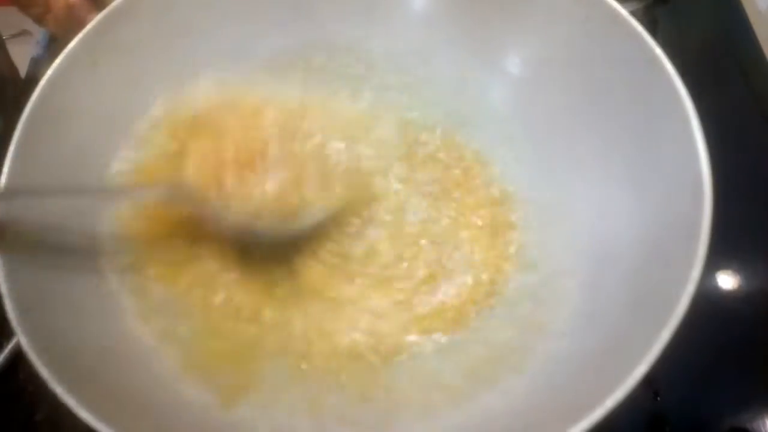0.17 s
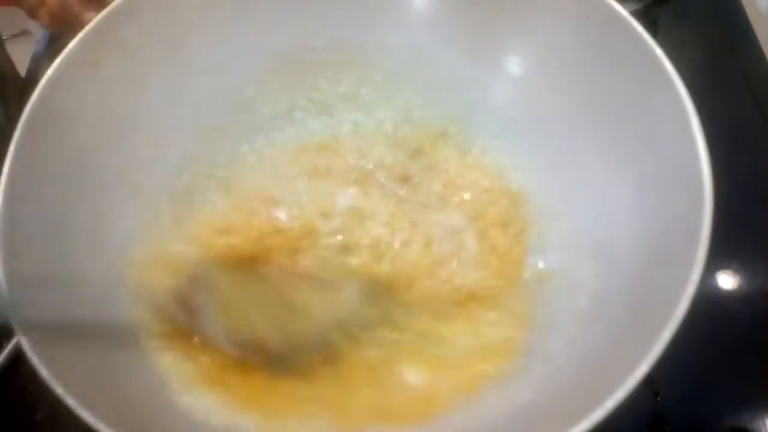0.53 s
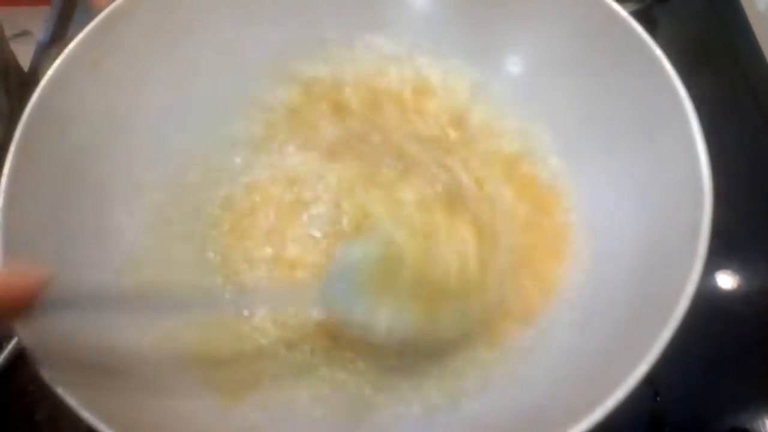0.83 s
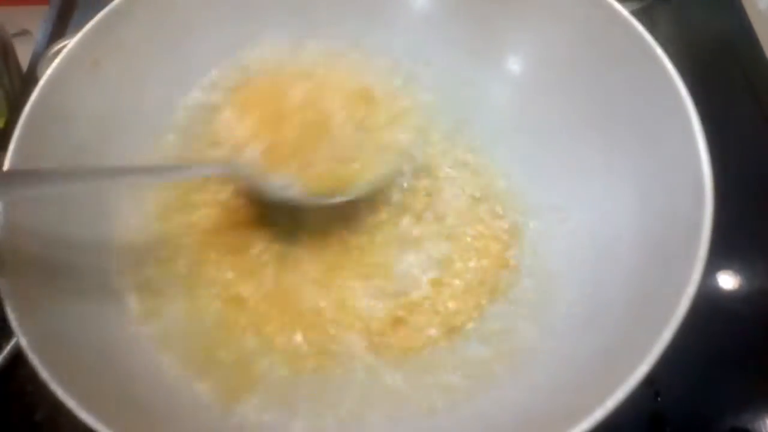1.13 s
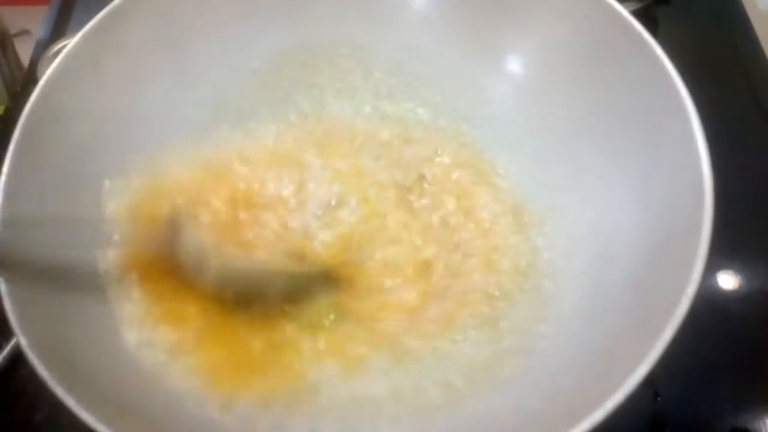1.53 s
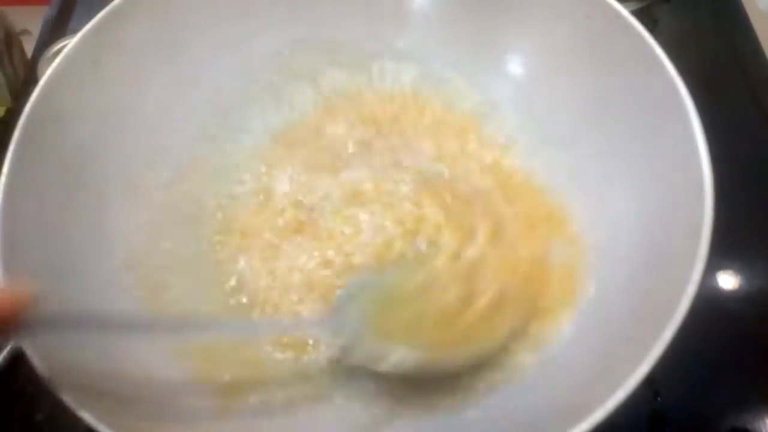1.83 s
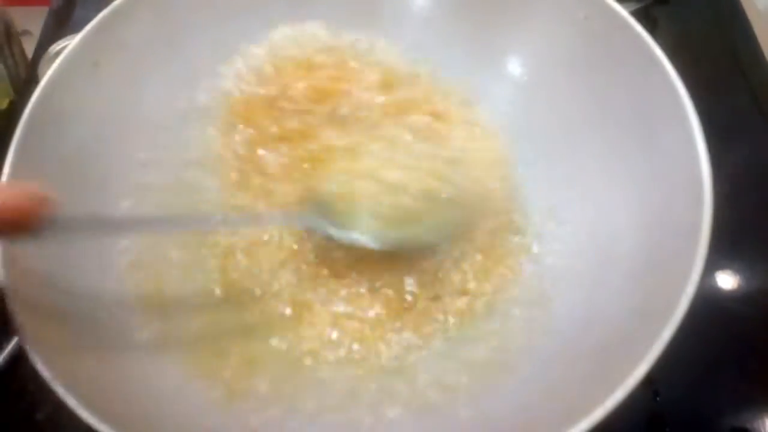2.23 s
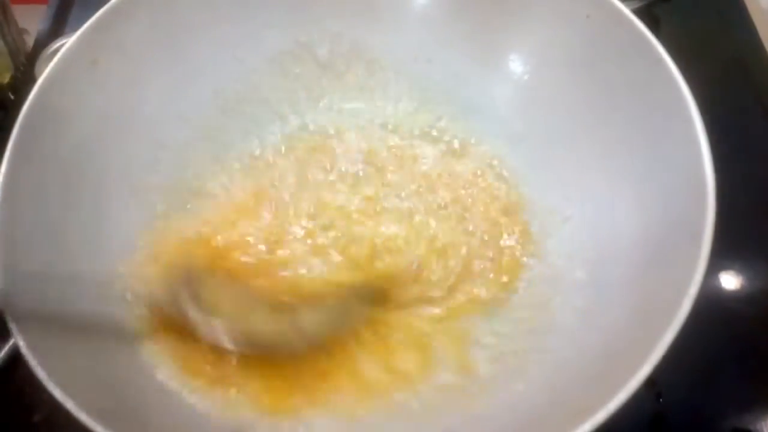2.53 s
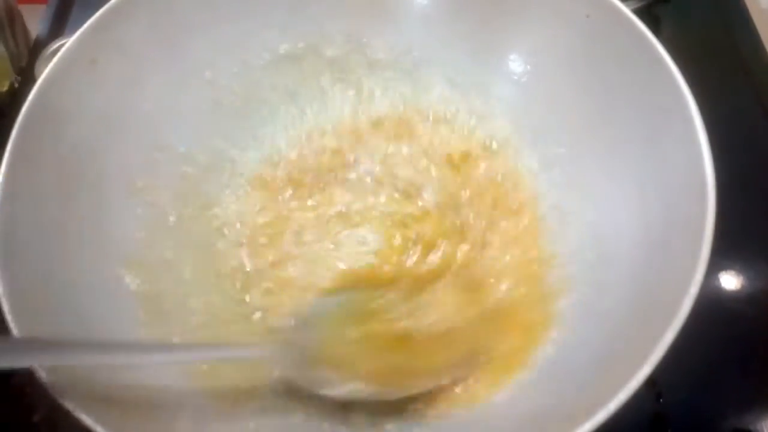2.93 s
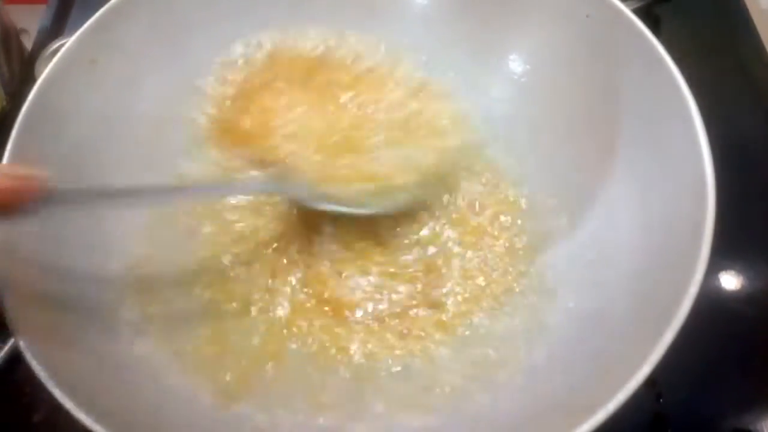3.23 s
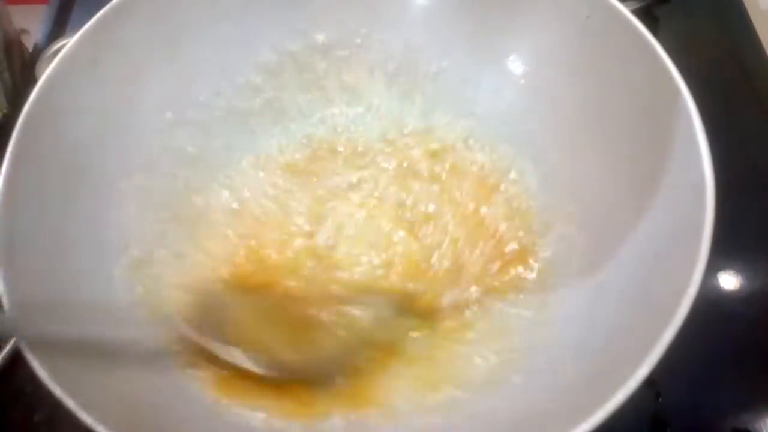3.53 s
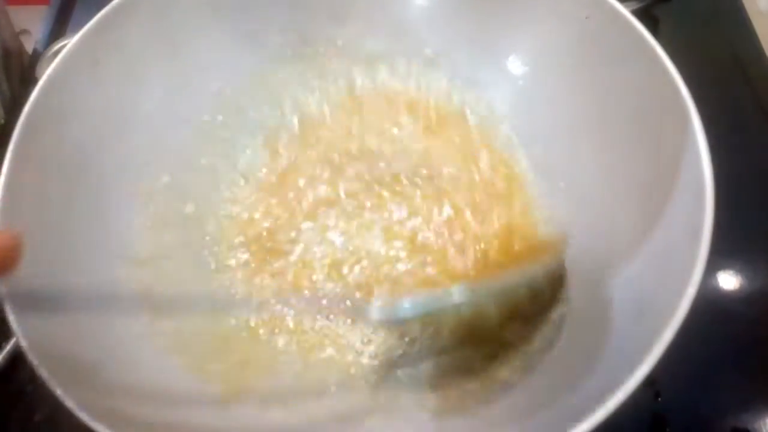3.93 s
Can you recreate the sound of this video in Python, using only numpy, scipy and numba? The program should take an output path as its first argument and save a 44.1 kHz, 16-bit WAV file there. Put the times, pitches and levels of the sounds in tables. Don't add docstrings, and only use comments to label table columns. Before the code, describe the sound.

Close, frothy frying sizzle fades into separate pops as a spoon drags and knocks in a wide metal pan, ringing once midway.

```python
import sys
import numpy as np
from scipy import signal
from scipy.fft import rfft, irfft
from scipy.io import wavfile
from scipy.ndimage import uniform_filter1d
from numba import njit

SR = 44100
rng = np.random.default_rng(int(sys.argv[2]) if len(sys.argv) > 2 else 0)


def unload_wav(signal):
    wavfile.write(
        sys.argv[1],
        SR,
        np.round(np.clip(np.atleast_2d(signal).T, -1, 1) * 32767).astype(np.int16),
    )


def convert_level_to_amplitude(level_db):
    exponent = np.asarray(level_db, float) / 20
    return 10 ** exponent


N = 180413
TIME_S = np.arange(N) / SR


def level(x, rms_db):
    return x * convert_level_to_amplitude(rms_db) / np.sqrt(np.mean(x ** 2))


def colour(x, points):
    hz, db = np.transpose(points)
    f = np.maximum(np.fft.rfftfreq(len(x), 1 / SR), 1)
    gain = convert_level_to_amplitude(np.interp(np.log(f), np.log(hz), db))
    return irfft(rfft(x) * gain, len(x))


def band(x, lo_hz, hi_hz, order=2):
    return signal.sosfilt(signal.butter(order, [lo_hz, hi_hz], "band", fs=SR, output="sos"), x)


def ring(x, modes):
    out = np.zeros(N)
    for hz, width_hz, db in modes:
        b, a = signal.iirpeak(hz, hz / width_hz, SR)
        out += convert_level_to_amplitude(db) * signal.lfilter(b, a, x)
    return out


def walk(rate_hz):
    hold = int(SR / rate_hz)
    steps = np.repeat(rng.standard_normal(N // hold + 1), hold)
    return 0.69 * uniform_filter1d(uniform_filter1d(steps, hold), hold)[:N]


@njit
def bursts(start, hz, tau, size, n):
    out = np.zeros(n)
    for e in range(len(start)):
        for j in range(min(int(9 * tau[e]), n - start[e])):
            u = j / tau[e]
            swell = 1.85 * u * u * np.exp(-u)
            out[start[e] + j] += size[e] * swell * np.sin(2 * np.pi * hz[e] * j / SR)
    return out


def echoed(start_s, hz, tau, size):
    start = (start_s * SR).astype(np.int64)
    place = rng.random((len(start), 2)).T
    near = start + (SR * (0.0015 + 0.002 * place[0])).astype(np.int64)
    far = start + (SR * (0.004 + 0.0054 * place[1])).astype(np.int64)
    out = bursts(start, hz, tau, size, N)
    out += bursts(near, hz, tau, size * convert_level_to_amplitude(-7.5), N)
    return out + bursts(far, hz, 2 * tau, size * convert_level_to_amplitude(-13.5), N)


# frequency in Hz, density in dB per Hz.
SIZZLE_COLOUR = [(180, -55), (300, -28.5), (514, -27), (646, -10.5), (893, -4), (1190, -18), (1510, -12),
                 (1730, -10.5), (2490, -9), (3930, -5.5), (5500, -0.5), (6470, -3.5), (7500, -18.5),
                 (9750, -48), (16500, -120)]
# frequency in Hz, gain in dB.
PORT = [(7500, 1), (8100, -9), (10500, -18), (11600, -25.5), (14000, -27), (14900, -14), (15500, -18)]
# time in seconds, sizzle level in dB.
BOIL = [(0, -23), (.35, -23), (.7, -21), (1.0, -21.5), (1.35, -22), (1.65, -22), (2.2, -23), (2.6, -23.5),
        (2.9, -25.5), (3.25, -25.5), (3.55, -27), (3.8, -28.5), (3.92, -31), (3.98, -29.5), (4.09, -30.5)]


def sizzle():
    count = 24000
    u = rng.random((count, 4)).T
    tau = SR * 0.00024 * convert_level_to_amplitude(5.8 * (u[2] - 0.5))
    size = convert_level_to_amplitude(np.minimum(-4 * np.log(1 - u[3]), 12)) / np.sqrt(tau)
    bubbles = echoed(u[0] * N / SR, 300 + 15500 * u[1], tau, size)
    ticks = rng.standard_normal(N) * (rng.random(N) < 300 / SR)
    froth = level(level(bubbles, 0) + level(ticks, -8), 0)

    hiss_db = 3.5 - 3 * TIME_S
    froth = froth + convert_level_to_amplitude(hiss_db) * rng.standard_normal(N)
    froth = froth * convert_level_to_amplitude(1.06 * walk(30.04)) / np.sqrt(1 + convert_level_to_amplitude(2 * hiss_db))
    froth = colour(froth, SIZZLE_COLOUR[:-2])
    froth = colour(froth, [(1000, -7.5), (1300, 1)] + PORT)

    big = signal.sosfiltfilt(signal.butter(2, 3700, fs=SR, output="sos"), froth)
    spray = signal.sosfiltfilt(signal.butter(6, 8000, "high", fs=SR, output="sos"), froth)
    big_db = 5.5 - 1.83 * TIME_S + 0.43 * walk(9.68)
    spray_db = 3.5 - 0.85 * TIME_S + 0.73 * walk(21.26)
    layers = froth + (convert_level_to_amplitude(big_db) - 1) * big + (convert_level_to_amplitude(spray_db) - 1) * spray
    return level(layers, 1.08) * convert_level_to_amplitude(np.interp(TIME_S, *np.transpose(BOIL)))


# frequency in Hz, density in dB per Hz.
KITCHEN = [(12, -54), (30, -1), (50, 4.5), (172, -14), (259, -36), (365, -19), (433, 12.5), (513, -13),
           (600, 6), (780, -27), (1320, -120)]


def kitchen():
    hum = colour(rng.standard_normal(N), KITCHEN)
    return level(hum, -66) * convert_level_to_amplitude(0.5 * walk(12.0))


# start in
# seconds, peak in dB, bubble pitch in Hz.
POPS = [(0.025, 2.5, 5540), (0.114, 3.5, 5550), (0.486, 5, 5900), (0.876, -9, 5700), (1.0195, 3.5, 3760),
        (1.1174, 2, 5700), (1.318, 2, 5000), (1.3795, 1, 5070), (1.699, 4, 5000), (1.936, 4, 5100),
        (1.981, 3, 4380), (1.9916, 3, 5790), (2.2199, 2, 5900), (2.7567, 2.5, 4100), (3.0093, 2.5, 5600),
        (3.1482, 3.5, 4830), (3.1662, 1, 5400), (3.3462, -6, 4720), (3.409, 0, 4370), (3.4845, -3, 5400),
        (3.5687, 3, 6400), (3.5856, 2, 6330), (3.6695, 4.5, 5660), (3.7219, -3, 6070), (3.7613, -2, 6000),
        (3.7778, 1.5, 5500), (3.8612, -5.5, 4370), (3.9681, 1.5, 5750), (3.9978, 0, 5690),
        (4.0377, -4.5, 4900),
        (2.6222, -1, 5450), (2.7102, -8, 4510), (2.819, 0, 5770), (2.843, 0, 5530), (2.8599, -7, 5100),
             (2.9447, -1, 5330), (2.969, 2, 5750), (3.044, 0, 5510), (3.0527, 2, 5200), (3.1006, 1, 5640),
             (3.1233, -6, 5470), (3.2096, -7, 5070), (3.2425, -2, 5490), (3.296, -3.5, 5680),
             (3.378, -5, 5330), (3.4465, -5, 5400), (3.5169, -6, 4170), (3.553, -5, 5310),
             (3.6127, -5, 5500), (3.659, -8, 5900), (3.7502, -9, 5820), (3.8127, -6, 5630),
             (3.9135, -11, 6230), (3.981, -4, 4700), (4.0077, -9, 5850), (4.0637, -11, 5200)]
# start in seconds, peak in dB.
SPITS = [(0.394, -40), (2.8948, -44), (2.9746, -41), (3.2839, -40), (3.3992, -42), (3.5004, -40),
         (3.5428, -43), (3.589, -42), (3.696, -45), (3.8142, -43), (3.8791, -44)]


def pops():
    s, db, hz = np.transpose(POPS)
    loud = echoed(s, hz, SR * 1.1 / hz, convert_level_to_amplitude(db - 11))

    count, thins_s = 45, 2.6
    u = rng.random((count, 3)).T
    hz = 5450 + 650 * np.log(u[1] / (1 - u[1])) / 2
    db = -5 + 0.5 * np.log(u[2])
    loud = loud + echoed(u[0] * thins_s, hz, SR * 1.1 / hz, convert_level_to_amplitude(db - 11.5))
    loud = colour(loud, [(7000, -0.5), (8500, -18)])

    spit = np.zeros(N)
    s, db = np.transpose(SPITS)
    spit[(s * SR).astype(int)] = convert_level_to_amplitude(db + 9)
    return loud + colour(spit, [(4000, 0)] + PORT)


def chatter(jolts_per_s, spread_db):
    jolts = rng.standard_normal(N) * (rng.random(N) < jolts_per_s / SR)
    return level(jolts, 0) * convert_level_to_amplitude(spread_db * walk(40)) + 0.58 * rng.standard_normal(N)


def held(x, span_s):
    return x / np.sqrt(uniform_filter1d(x ** 2, int(span_s * SR)) + 1e-12)


def touched(touches, rise_db_per_s, fall_db_per_s, hum_db, hum_db_per_s, db_column=2):
    power = convert_level_to_amplitude(2 * (hum_db + hum_db_per_s * TIME_S))
    for row in touches:
        start_s, hold_s = row[:2]
        early_s = np.maximum(start_s - TIME_S, 0)
        late_s = np.maximum(TIME_S - start_s - hold_s, 0)
        db = row[db_column] - rise_db_per_s * early_s - fall_db_per_s * late_s
        power = power + convert_level_to_amplitude(2 * db)
    return np.sqrt(power)


# frequency in Hz, width in Hz, gain in dB.
STOVE = [(113.4, 8.7, -3), (179, 5.7, -3), (229, 32, -0.5), (300, 120, 3.5)]
# frequency in Hz, width in Hz, gain in dB.
PAN_RIM = [(449, 23, -4.5), (496, 24, -1.5)]
# start in seconds, hold in seconds, stove dB, rim dB.
SHOVES = [(.03, 0.031, -66, -48.5), (.26, 0.037, -51, -46), (.39, 0.053, -50, -46), (.77, 0.023, -52, -48),
          (.82, 0.044, -56, -57), (.9, 0.016, -65, -45.5), (1.155, 0.015, -52, -53),
          (1.24, 0.13, -54.5, -53), (1.67, 0.024, -53, -47.5), (1.78, 0.026, -41.5, -42),
          (1.88, 0.031, -58, -51), (2.23, .04, -62, -51), (2.32, 0.087, -46, -45), (2.48, .03, -71, -67),
          (2.71, .03, -57, -46.5), (2.79, 0.051, -48, -54), (2.89, 0.017, -65, -42.5),
          (3.22, .04, -57.5, -52), (3.29, 0.031, -48.5, -47.5), (3.36, 0.025, -56, -50),
          (3.42, 0.027, -71, -48), (3.5, .02, -60.5, -53), (3.74, 0.026, -61, -52), (3.79, 0.024, -52, -62),
          (4.08, .02, -60, -55)]
# start in seconds, hold in seconds, level in dB.
BOOMS = [(.26, .03, -61), (.4, .03, -51.5), (.46, 0.14, -62), (.765, .03, -54), (.87, 0.047, -62),
         (1.16, 0.018, -57), (1.27, .03, -62), (1.79, .02, -52), (1.86, 0.049, -62), (2.38, .05, -60),
         (2.48, 0.027, -62), (2.72, 0.018, -66), (3.325, 0.06, -56), (3.47, 0.055, -67), (3.84, 0.024, -64)]


def stove_and_rim(drag):
    stove = held(band(ring(drag, STOVE[1:]), 132, 384), 0.077) * touched(SHOVES, 600, 140, -62.5, -3.5)
    boom = held(band(ring(drag, STOVE[:1]), 64, 156), 0.055) * touched(BOOMS, 800, 220, -76, -0.5)
    rim = held(band(ring(drag, PAN_RIM), 398, 483), 0.044)
    return stove + boom + rim * touched(SHOVES, 403, 166, -53.5, -3.5, db_column=3)


# frequency in Hz, width in Hz, gain in dB.
PAN_FLOOR = [(595, 132, 16.5), (655, 69, 10), (738, 120, 7), (840, 39, 5.5), (910, 50, -24)]
# start in seconds, hold in seconds, level in dB.
FLOOR_TOUCHES = [(.105, 0.014, -41), (.25, 0.046, -36), (.34, 0.08, -37.5), (.52, 0.025, -40.5),
                 (.715, 0.025, -33), (.81, 0.015, -35), (1.16, .15, -37), (1.34, 0.024, -32),
                 (1.66, 0.028, -33), (1.775, 0.029, -31.5), (2.19, .06, -41), (2.30, 0.12, -37),
                 (2.69, 0.047, -32.5), (2.755, 0.026, -33), (2.86, .06, -42), (3.225, 0.074, -31.5),
                 (3.33, .03, -36.5), (3.39, 0.041, -35.5), (3.728, 0.028, -32.5), (3.78, 0.048, -48),
                 (4.0, .01, -47.5)]


def pan_floor(drag):
    floor = ring(drag, PAN_FLOOR) + ring(drag, PAN_FLOOR[:2])
    return held(band(floor, 571, 994, order=4), 0.035) * touched(FLOOR_TOUCHES, 1000, 300, -40, -4)


# frequency in Hz, width in Hz, gain in dB.
PAN_WALL = [(1531, 28, 1), (1353, 380, -5.5), (1472, 140, -5), (1014, 190, -5)]
# start in seconds, hold in seconds, level in dB.
WALL_TOUCHES = [(.21, .02, -35), (.46, .07, -35.5), (.73, .04, -33), (.89, 0.062, -33), (1.05, 0.018, -34),
                (1.35, 0.02, -33.5), (1.81, 0.056, -34.5), (2.33, 0.088, -29), (2.84, 0.073, -37),
                (3.11, 0.019, -44), (3.38, 0.079, -37.5), (3.78, 0.015, -39)]
# start in seconds, hold in seconds, level in dB.
SQUEAKS = [
    (1.81, 0.036, -44.5),
    (2.845, 0.092, -42),
    (3.11, .02, -37),
    (3.38, 0.041, -37),
]


def pan_wall():
    wall = held(band(ring(chatter(900, 2.0), PAN_WALL), 933, 1766), 0.04)
    sharpest = PAN_WALL[:1]
    squeak = held(ring(ring(chatter(1600, 0.8), sharpest), sharpest), 0.02)
    wall = wall * touched(WALL_TOUCHES, 400, 303, -36.5, -3.5)
    return wall + squeak * touched(SQUEAKS, 1500, 1200, -80.5, 5.2)


def scrape():
    drag = chatter(900, 6.7)
    return stove_and_rim(drag) + pan_floor(drag) + pan_wall()


# start in seconds, peak in dB, dullness 0-1.
KNOCKS = [
    (0.399, -34, 0.66),
    (0.778, -32.5, 0.96),
    (1.165, -30.5, 0.86),
    (1.775, -25, 0.3),
    (2.378, -18, 0.66),
    (3.308, -22, 0.8),
]


def knocks():
    out = np.zeros(N)
    t = np.arange(4000) / SR
    for s, db, dull in KNOCKS:
        dull = np.clip(dull, 0, 1)
        blow = rng.standard_normal(len(t)) * (np.exp(-t / 0.0027) + 0.15 * np.exp(-t / 0.013))
        blow = band(blow, 90 + 900 * (1 - dull) ** 2, 6000 * 10 ** -dull)
        k = int(s * SR)
        out[k:k + len(t)] += convert_level_to_amplitude(db) * blow / np.abs(blow).max()
    return out


SPOON_HZ = [1682, 3720, 4150, 2550, 1925]
# width in Hz, gain in dB.
SPOON = [(23.76, 7), (27, -1), (40, -4.5), (23.148, -6), (25, -9)]
# start in seconds, hold in seconds, level in dB.
BARE_STEEL = [
    (2.305, 0.039, -30),
    (2.365, 0.042, -25),
]


def spoon_bowl():
    bowl = []
    for hz, (width_hz, db) in zip(SPOON_HZ, SPOON):
        bowl.append((hz, width_hz, db / 2))
    sing = held(ring(ring(chatter(1400, 0.81), bowl), bowl), 0.015)
    return sing * touched(BARE_STEEL, 1500, 1200, -80.5, 5.2)


def scene():
    return (sizzle() + kitchen() + pops() + scrape() + knocks() + spoon_bowl())[None]


def band_limit(x):
    return signal.sosfilt(signal.butter(12, 16850, fs=SR, output="sos"), x)


def record(dry):
    top_hz = 15440
    cut = signal.sosfiltfilt(signal.ellip(10, 0.1, 60, top_hz, fs=SR, output="sos"), dry)
    return band_limit(cut)


dry = scene()
out = record(dry)
unload_wav(out)
```